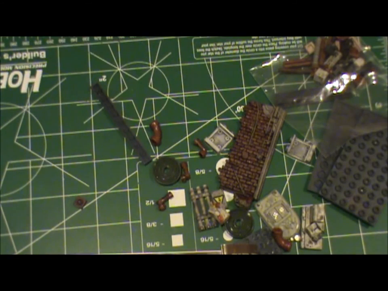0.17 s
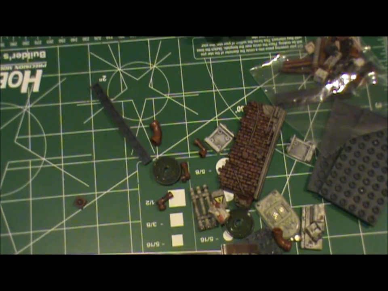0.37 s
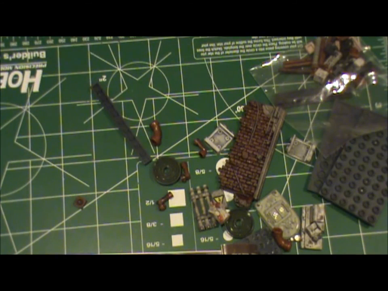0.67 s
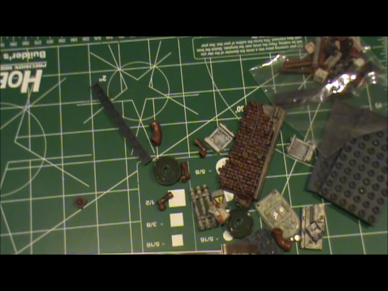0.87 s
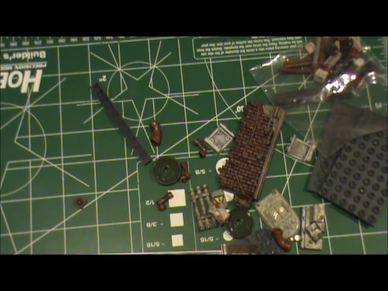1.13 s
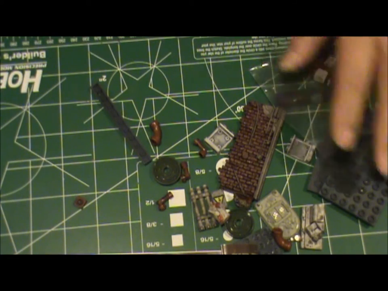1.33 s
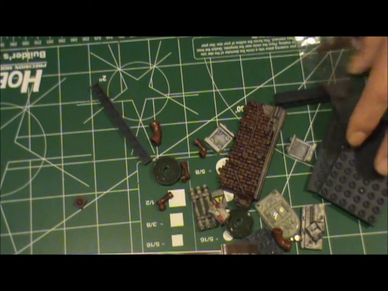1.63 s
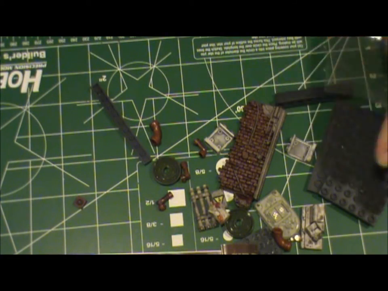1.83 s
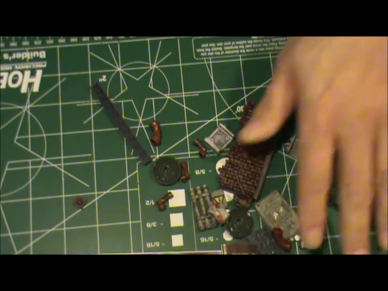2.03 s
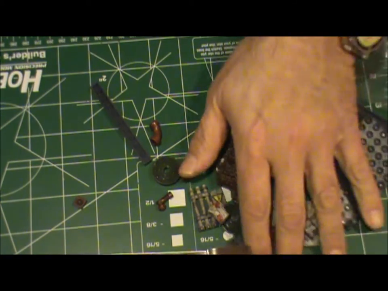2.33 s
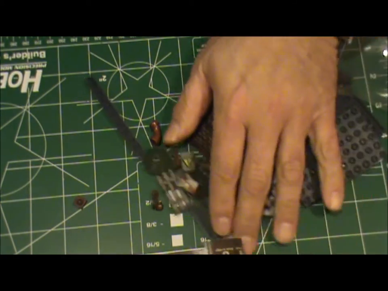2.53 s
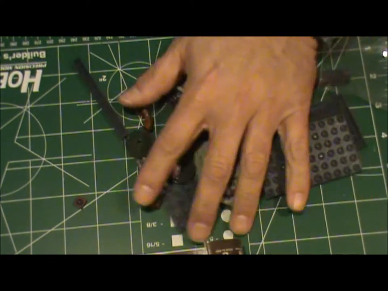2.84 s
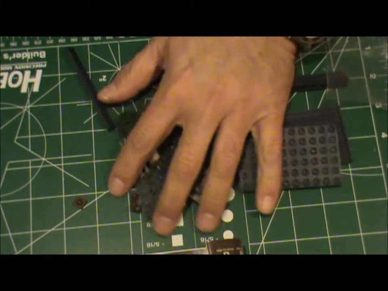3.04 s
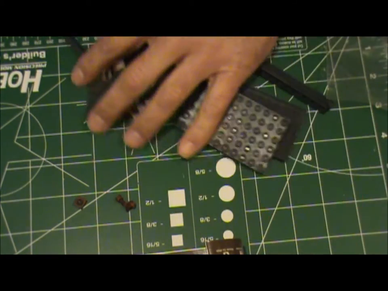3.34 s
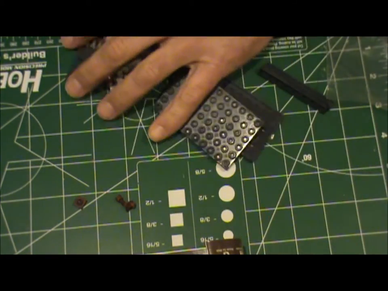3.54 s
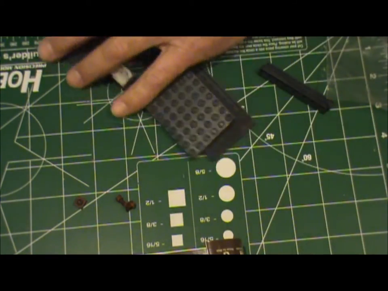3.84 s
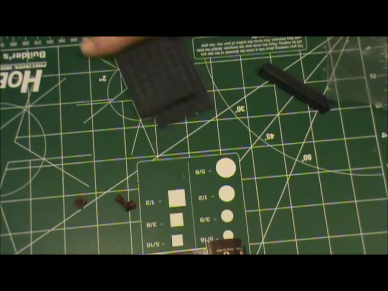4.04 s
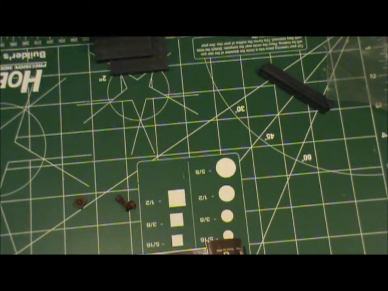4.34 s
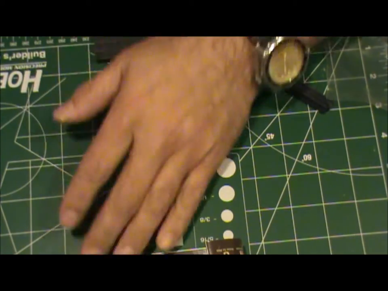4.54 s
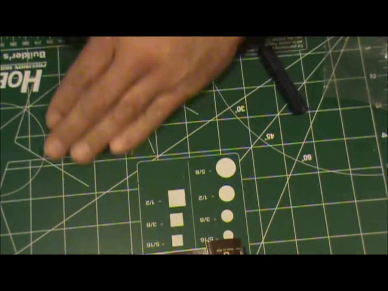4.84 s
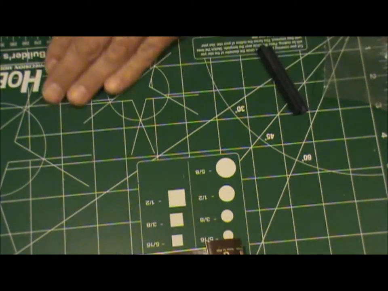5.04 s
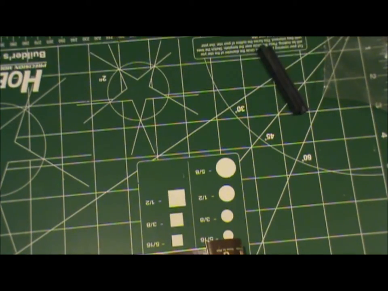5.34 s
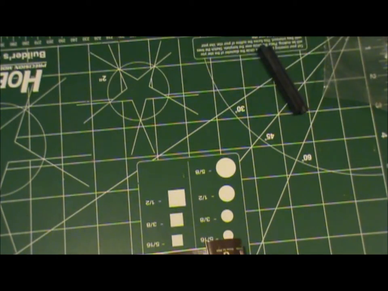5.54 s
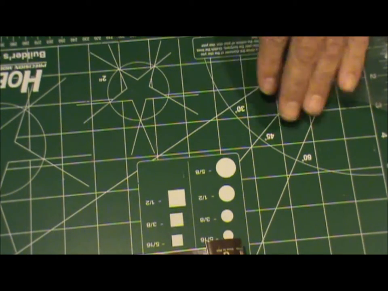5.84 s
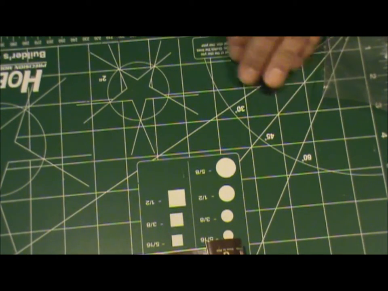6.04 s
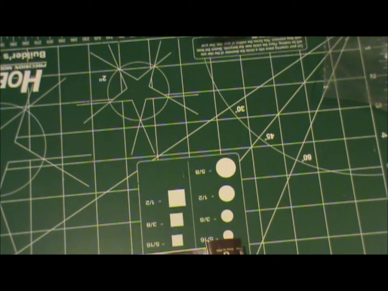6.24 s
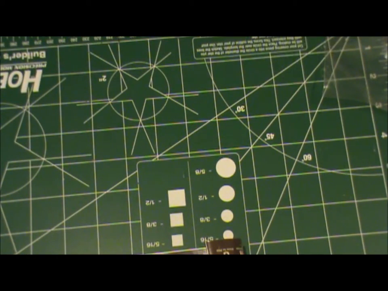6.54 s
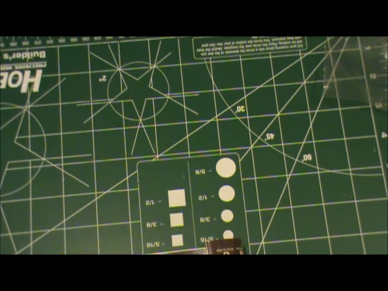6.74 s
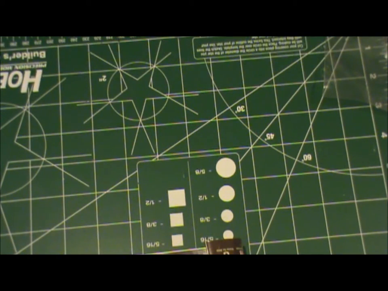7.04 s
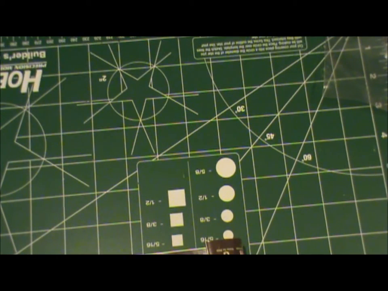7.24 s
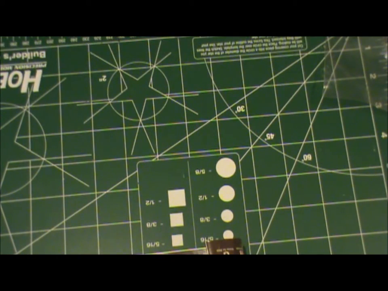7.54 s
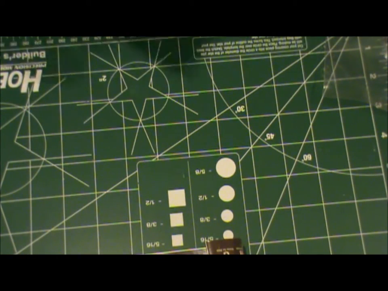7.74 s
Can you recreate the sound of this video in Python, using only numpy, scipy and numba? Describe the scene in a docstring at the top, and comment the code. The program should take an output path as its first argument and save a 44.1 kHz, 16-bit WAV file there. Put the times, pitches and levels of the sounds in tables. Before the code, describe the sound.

Close stereo sound in a small, fairly dry room with a faint steady hiss. From 0 to 0.4 seconds, hard little plastic pieces clatter into a hollow box, with bright clicks. Light taps and a soft drag follow, then another short clatter at 0.85-1.15. Around 1.4-1.9 there are only small clicks and faint rustling. From 2.2 a hand sweeps the heap over a cutting mat: a fine, dry, grainy scrape with thin singing tones and a few taps near 3.1, swelling until 4.0. The pieces then pour into the box, a dense loud rattle peaking near 4.25, trailing into knocks until 4.7. A quieter scrape leads to a sharp drop at 5.3-5.7. Light ticks and a thin drag around 6-6.35 precede tumbling knocks at 6.5-7.1. A short scrape with hollow knocks comes at 7.3-7.7, then faint settling to the end.

```python
"""A heap of small plastic pieces is swept by hand across a cutting mat and over the table edge into a box, close by.
Sliding is a dense fine grain, tumbling a coarse one that rings pieces and box; tables of moves shape both.
Single pieces knock as noise bursts that feed a piece's mode, the hollow box and bright edge ticks; light taps click,
dragged pieces sing through one moving resonance, and bumps ring the table top as low decaying sines.
A small room answers with a short tail of noise, over a steady hush; two microphone ports hear it in stereo."""
import sys
import numpy as np
from scipy import signal
from scipy.fft import rfft, irfft, next_fast_len
from scipy.io import wavfile
from scipy.ndimage import uniform_filter1d
from numba import njit

SR = 44100
rng = np.random.default_rng(int(sys.argv[2]) if len(sys.argv) > 2 else 0)


def int16_out(signal):
    """Quantize to a 16-bit WAV file."""
    q = np.round(np.clip(np.atleast_2d(signal).T, -1, 1) * 32767)
    wavfile.write(sys.argv[1], SR, q.astype(np.int16))


N = 348390

# Colour of knocking, tumbling plastic. Each row: frequency in Hz, relative level in dB per Hz.
PLASTIC_COLOUR = [(150, -66), (530, -11.5), (900, -3.5), (1140, -4.0), (1520, 3.5), (1750, -1.5),
                  (2050, 3.5), (2540, -3), (2850, -0.5), (7500, -8.5), (9750, -21.5), (16500, -120)]
# Colour of the bright ticking of edges. Each row: frequency in Hz, relative level in dB per Hz.
TICK_COLOUR = [(2600, -118.5), (3820, -38.5), (6500, 10), (8060, 12), (8790, 7.5), (9840, 7.0),
               (10900, 4.5), (13600, -2.5), (16000, -15.5)]


def undb(db):
    """Turn dB into an amplitude factor."""
    return 10 ** (np.asarray(db) / 20)


def unit(x):
    """Scale to rms 1."""
    return x / np.sqrt(np.mean(x ** 2))


def read(table, hz):
    """Value of a (Hz, value) table, straight on a log axis."""
    f, v = np.transpose(table)
    return np.interp(np.log(hz + 1), np.log(f + 1), v)


def response(table, size=2048):
    """Causal response of unit energy with the table's colour, from the folded cepstrum."""
    log_colour = read(table, np.fft.rfftfreq(size, 1 / SR)) * np.log(10) / 20
    cep = irfft(log_colour)
    cep[1:size // 2] *= 2
    cep[size // 2 + 1:] = 0
    h = irfft(np.exp(rfft(cep)))
    return h / np.sqrt(np.sum(h ** 2))


def through(x, h):
    """Convolve with a response, cut to the scene's length."""
    return signal.fftconvolve(x, h)[:N]


def decay(t, t60):
    """Exponential fade by 60 dB in t60 seconds."""
    return np.exp(-np.log(1000) * t / t60)


@njit
def rings(at, hz, t60, size, n, sr):
    """Each contact leaves a decaying sine, cut after its 60 dB time."""
    out = np.zeros(n)
    for k in range(len(at)):
        turn = np.exp(complex(-np.log(1000.) / (t60[k] * sr), 2 * np.pi * hz[k] / sr))
        z = size[k] + 0j
        for i in range(at[k], min(n, at[k] + int(t60[k] * sr))):
            z *= turn
            out[i] += z.imag
    return out


@njit
def svf(x, hz, share, sr):
    """Band-pass resonance with a moving centre; its width is a share of the centre."""
    y, b, l = np.empty(len(x)), 0., 0.
    for i in range(len(x)):
        g = np.tan(np.pi * hz[i] / sr)
        v = (b + g * (x[i] - l)) / (1 + g * (g + share))
        b, l, y[i] = 2 * v - b, l + 2 * g * v, share * v
    return y


def wander(per_s):
    """Slow chance of rms 1: noise averaged twice over 1 / per_s seconds."""
    size = int(SR / per_s)
    return unit(uniform_filter1d(uniform_filter1d(rng.standard_normal(N), size), size))


def contacts(per_s, spread_db, t60):
    """Random contacts of very unequal size, each a short burst of chatter; rms 1."""
    count = int(per_s * N / SR)
    clicks = np.zeros(N)
    sizes = undb(spread_db * np.minimum(rng.exponential(size=count), 3.5))
    np.add.at(clicks, rng.integers(0, N, count), sizes)
    fade = decay(np.arange(SR // 10) / SR, t60)
    power = through(clicks ** 2, fade ** 2)
    return unit(np.sqrt(np.abs(power)) * rng.standard_normal(N))


def air():
    """Quiet room and camera hiss: coloured noise with shared bass and treble that differs between the ports."""
    # Colour of the hush. Each row: frequency in Hz, relative level in dB per Hz.
    hush_colour = [(12, -37.5), (20, 3), (70, 7.5), (123, 9), (172, 3), (262, 1), (410, 4.5), (660, -4.5),
                   (2140, -11.5), (13200, -18.5), (16000, -22.5)]
    level_db = -61.5
    mid, side = (unit(through(rng.standard_normal(N), response(hush_colour, size=8192))) for _ in range(2))
    side = signal.lfilter(*signal.butter(1, 600, "high", fs=SR), side)
    return undb(level_db) * (mid + 0.58 * side * np.array([[1], [-1]]))


def room(x):
    """Table and walls scatter the sound differently to each port, as decaying band-passed noise."""
    t60_s, band_hz = 0.24, [380, 6500]
    t = np.arange(SR // 2) / SR
    tail = rng.standard_normal((2, len(t))) * decay(t, t60_s) * np.minimum(t / 0.0004, 1)
    tail = signal.lfilter(*signal.butter(1, band_hz, "band", fs=SR), tail)
    return np.array([through(x, h / np.sqrt(np.sum(h ** 2))) for h in tail])


def ports(x):
    """The camera body shades its two microphone ports, so level and phase differ between them."""
    # Shading by the body. Each row: frequency in Hz, left minus right level in dB.
    port_db = [(60, 0), (200, -2.5), (380, -3.5), (700, -7), (1290, -4.5), (2380, -1), (4400, 0), (8120, 2),
               (15000, 1.5)]
    # Phase between the ports. Each row: frequency in Hz, lead of the left port in radians.
    port_lead = [(200, -0.55), (520, -0.13), (850, -0.98), (1210, 0.83), (2300, -0.54), (4500, -0.3),
                 (7900, 1.42), (10500, 0.25)]
    size = next_fast_len(N)
    hz = np.fft.rfftfreq(size, 1 / SR)
    half = undb(read(port_db, hz) / 2) * np.exp(.5j * read(port_lead, hz))
    return irfft(rfft(x, size) * np.array([half, 1 / half]), size)[:, :N]


def thuds():
    """Hand and box bump the table; soft bumps ring its top low, briefly and unevenly."""
    # Bumps. Each row: start in seconds, relative level in dB, pitch in Hz, time to fade 60 dB in seconds
    # (held to 0.02 s or more).
    bump_rows = [(2.176, -39.5, 273, 0.11), (2.231, -40.5, 235, 0.22), (4.107, -30, 295, 0.081),
                 (4.263, -12, 270, 0.017), (4.309, -25, 230, 0.086), (5.396, -25, 154, 0.1),
                 (6.588, -33, 198.6, 0.22), (6.927, -26.5, 213, 0.13), (7.046, -13, 118, 0.03),
                 (7.566, -31, 204, 0.024)]
    s, level_db, hz, t60 = np.transpose(bump_rows)
    at = (s * SR).astype(np.int64)
    bumps = rings(at, hz, np.clip(t60, .02, .3), undb(level_db - 1.5), N, 1. * SR)
    uneven = bumps * (1 + 0.69 * wander(97))
    return signal.lfilter(*signal.butter(2, 500, fs=SR), uneven)


def taps():
    """Light taps of a piece on the mat: a dry click with a very short broad tail, band-passed twice."""
    # Taps. Each row: start in seconds, peak level in dB before the mix, centre in Hz.
    tap_rows = [(0.387, -36, 4000), (0.4655, -17, 5000), (0.7467, -25, 4700), (0.786, -28, 3200),
                (1.406, -41, 4500), (1.4598, -25, 2500), (1.471, -25.5, 2580), (1.485, -27, 3180),
                (1.5418, -23, 3400), (1.764, -36.5, 3000), (1.8422, -37, 2350), (2.003, -45, 2380),
                (2.2159, -35, 4000), (2.3042, -40, 5000), (2.3444, -40, 4200), (3.034, -27, 2000),
                (3.1378, -18, 4200), (3.226, -20, 4500), (5.841, -37.5, 1560), (5.9155, -56, 4400),
                (6.1798, -19, 3600), (6.2826, -25, 5660), (6.325, -29, 3000), (6.3514, -37, 5000),
                (6.378, -32, 3470)]
    t60_s, width = 0.018, 1.2  # width as a share of the centre
    t, out = np.arange(SR // 20) / SR, np.zeros(N + SR)
    chatter = rng.standard_normal((len(tap_rows), len(t))) * decay(t, t60_s)
    chatter[:, 0] += 5.  # the click itself
    for (s, db, hz), burst in zip(tap_rows, chatter):
        at = int(s * SR)
        centre = np.full(len(t), 1. * hz)
        click = svf(svf(burst, centre, width, 1. * SR), centre, width, 1. * SR)
        out[at:at + len(t)] += undb(db) * click / np.abs(click).max()
    return out[:N]


def drags():
    """Stick-slip grain feeds one resonance of a piece that sings above the scrape while it is dragged."""
    # Drags. Each row: start and end in seconds, start and end pitch in Hz, level in dB before a swell and the mix.
    drag_rows = [(0.472, 0.596, 3800, 2400, -44.5), (0.59, 0.76, 2500, 2760, -55.5),
                 (2.44, 2.695, 1800, 1830, -42), (2.865, 2.891, 2730, 2780, -37.5),
                 (3.18, 3.575, 2320, 2380, -43.5), (3.798, 4.04, 1380, 1540, -39),
                 (3.767, 4.093, 2350, 2340, -39), (4.786, 4.985, 3200, 3170, -46.5),
                 (5.118, 5.33, 3200, 3220, -46.5), (6.02, 6.31, 4500, 4800, -43),
                 (5.925, 6.305, 3200, 3500, -49.5), (7.474, 7.552, 5230, 5170, -34.5),
                 (7.486, 7.555, 5570, 5570, -38.5), (7.487, 7.553, 1510, 1470, -32.5),
                 (7.547, 7.68, 1310, 1100, -35.5), (7.762, 7.9, 1100, 900, -49)]
    width = .09  # share of the centre
    stray = 0.013  # the resonance strays by this share as the piece turns
    out, grain = np.zeros(N), contacts(1600, 1.2, 0.0091)
    turn = wander(40)
    for start, end, hz0, hz1, db in drag_rows:
        a, b = int(start * SR), int(end * SR)
        pitch = np.linspace(hz0, hz1, b - a) * (1 + stray * turn[a:b])
        tone = unit(svf(grain[a:b], pitch, width, 1. * SR))
        out[a:b] += undb(db) * np.sqrt(np.hanning(b - a)) * tone
    return out


def box(push):
    """The box's modes, radiating best in mid band; where it is struck keeps changing."""
    # Air and walls of the box. Each row: frequency in Hz, width in Hz, relative level in dB.
    box_modes = [(250, 89, -3.5), (323, 60, 1), (433, 48, -4), (528, 41, 3.5), (653, 60, 9), (731, 51, 7.5),
                 (850, 300, -9)]
    place_db, stray = 3.0, 0.03  # each spot favours other modes, and the load of pieces shifts them
    out = np.zeros(len(push))
    for hz, width, db in box_modes:
        struck = push * undb(place_db * wander(12.7))
        centre = hz * (1 + stray * wander(4.4))
        out += undb(db) / np.sqrt(np.pi * width / SR) * svf(struck, centre, width / hz, 1. * SR)
    return undb(-15.5) * signal.lfilter(*signal.butter(2, [304, 870], "band", fs=SR), out)


def knocks():
    """A sharp crack with chatter behind it excites piece, box and edge ticks."""
    # Single knocks. Each row: start in seconds, strength in dB, ring of the piece in Hz, then ring, box
    # and bright tick in dB relative to the strength, ahead of each layer's own gain.
    knock_rows = [(0.0543, -16, 2910, -2.5, -1, -27), (0.1346, -12.5, 4450, -4.5, -36, -14),
                  (0.2464, -25, 5000, 0, 5, -23), (0.2846, -22.5, 1400, 5, 0.5, -22),
                  (0.3066, -20.5, 1770, -9, -3, -14.5), (0.3257, -19.5, 1880, -13, -15.5, -19),
                  (0.344, -28, 5530, -20, -4, -19), (0.3696, -21.5, 1170, -8, -14, -29),
                  (0.8591, -13.5, 4350, -5, -8.5, -12), (0.8854, -19.5, 1730, -15, -4, -21),
                  (0.892, -28, 7140, 6, -39, -3), (0.8984, -16, 4160, 0, -12, -11),
                  (0.9292, -28.5, 4600, -8, 3.5, -20), (0.946, -16, 4770, 2, -24, -12),
                  (1.023, -17, 1256, -10, -4, -13), (1.0849, -18.5, 3620, -3, -12, -18),
                  (1.1218, -20, 1730, -5.5, -10, -26), (1.1493, -23.5, 1420, -2.5, -13.5, -18.5),
                  (2.176, -27.5, 3480, -6, -18, -19), (2.224, -30.5, 1150, -6, -30, -36),
                  (2.2474, -34, 1060, -7, -13, -24), (2.731, -38.5, 1790, -1, -17, -29.5),
                  (3.5945, -28, 4930, -7, -32, -18.5), (3.6321, -32, 3620, 0, -24, -10),
                  (3.728, -30.5, 2430, -1, -34, -28), (4.0339, -13, 4650, -3, -8, -13),
                  (4.0484, -35, 4730, -3, -7, -20), (4.1099, -18.5, 1320, -3, -5, -11),
                  (4.1205, -18.5, 2100, -14, -0.5, -15), (4.211, -19.5, 2870, 1, -7, -9),
                  (4.4424, -20.5, 1490, 5.5, 0, -28), (4.4702, -21.5, 1020, 8.5, -4, -33),
                  (4.5002, -15, 1070, -3, -12, -40), (4.5446, -19.5, 1070, -6, 2, -32),
                  (4.5735, -19.5, 1020, 0, -9, -16.5), (4.6029, -20.5, 3120, -12, -9.5, -13.5),
                  (4.618, -17, 1940, -1, -5, -35), (4.6354, -15.5, 1440, -5.5, -12.5, -32),
                  (4.7057, -30, 1043, -15, 6.5, -20), (4.7227, -24.5, 1017, -9.5, -11, -26),
                  (4.7714, -43.5, 1040, -4, 8, -17), (4.8024, -40, 4270, -3, 6, -20),
                  (4.9934, -34, 1550, -14, -23, -26), (5.3037, -24, 4850, 7, -2, -7),
                  (5.308, -17.5, 7350, 0, -20, -20), (5.3662, -15.5, 1120, -7, -5.5, -17.5),
                  (5.3896, -26.5, 1990, -1, -1, -23), (5.4038, -16.5, 1540, -14, -15, -14.5),
                  (5.4234, -18, 1370, -14, -2.5, -23), (5.5223, -23, 2190, -20, -13, -3),
                  (5.5782, -19, 2060, -8, -4, -21), (5.6088, -17.5, 9800, -5, -12.5, -12.5),
                  (5.6275, -18.5, 10100, -1.5, -19, -15), (5.6692, -22, 10200, -2, -9, -14),
                  (5.7009, -28, 2663, -1, -26, -17), (5.7025, -31, 3590, 4.5, -27, -20),
                  (5.7239, -29.5, 1300, -2, -7, -11), (5.7676, -37, 1340, 0, -3, -17),
                  (6.306, -28, 3040, -9, -23, -12), (6.4805, -18, 1540, -18.5, -6.5, -10.5),
                  (6.504, -26.5, 2120, -18, -9.5, -1.5), (6.565, -18, 2170, -10, -7, -20),
                  (6.5954, -14.5, 1400, -3.5, -4, -18), (6.6712, -20, 1890, -4, -7, -16.5),
                  (6.7082, -21.5, 2100, -13, 1, -42), (6.7264, -22.5, 1035, -2, -3, -35),
                  (6.7506, -25, 1420, 0, 5, -35), (6.7655, -42, 1410, -5, 0, -32),
                  (6.783, -14, 1360, -3, -11, -40), (6.8069, -17, 1810, -3.5, -3.5, -21.5),
                  (6.8349, -23.5, 1040, 1, 0.5, -28), (6.8673, -17.5, 4660, -5.5, -14, -30),
                  (6.931, -19, 1280, -13, -19, -12), (7.0454, -14.5, 1350, 4, -19, -36),
                  (7.0544, -13, 1590, 1, -9, -27), (7.2524, -38.5, 1270, 5.5, 2, -33),
                  (7.2789, -30.5, 1450, -1, -8, -29), (7.3562, -21.5, 4700, -9.5, -7, -26),
                  (7.3685, -20, 1870, -5, -30, -34), (7.3739, -27, 1930, 3, -4, -32),
                  (7.4164, -31, 2000, 3.5, 2, -28), (7.4325, -22.5, 2030, -5, -18, -31),
                  (7.7051, -27.5, 1253, 13, -10, -40), (7.7797, -43, 1060, 11, -28, -22)]
    chatter_t60_s, crack_s = 0.05, 0.00069
    box_push_s = 0.0044  # the box feels only the start of a knock
    s, level_db, hz, ring_db, box_db, tick_db = np.transpose(knock_rows)
    at, t = (s * SR).astype(np.int64), np.arange(SR // 6) / SR
    chatter = rng.standard_normal((len(s), len(t)))
    chatter = chatter / chatter[:, :SR // 200].std(axis=1, keepdims=True)  # rms 1 over the first 5 ms
    crack = undb(5) * np.exp(-t / crack_s)
    shape = decay(t, chatter_t60_s) * np.minimum(t / 0.0022, 1) + crack
    feel = np.array([1 + 0 * t, np.exp(-t / box_push_s), 1 + 0 * t])
    push, ring = np.zeros((3, N + len(t))), np.zeros(N + len(t))  # push on body, box and edges
    for k in range(len(s)):
        span = slice(at[k], at[k] + len(t))
        burst = chatter[k] * shape * undb(level_db[k])
        # a piece that rings more has less broad body sound
        push[:, span] += undb([[-.6 * ring_db[k]], [box_db[k]], [tick_db[k]]]) * burst * feel
        burst[0] += undb(level_db[k] + 23.0)  # the blow itself
        push[1, at[k]] += undb(level_db[k] + box_db[k] + 19.0)
        # the chatter keeps feeding the piece's damped mode
        mode = svf(burst, np.full(len(t), hz[k]), 0.056, 1. * SR)
        ring[span] += undb(ring_db[k]) * np.sqrt(SR / hz[k]) * mode
    body = undb(-11.0) * through(push[0], response(PLASTIC_COLOUR))
    drum = undb(4.5) * box(push[1, :N])
    tick = undb(5) * through(push[2], response(TICK_COLOUR))
    return body + drum + tick + ring[:N]


def heap_levels():
    """Rattle, drumming and ticking in dB over time; overlapping moves add in power."""
    # Swells of the moving heap, pushed over the mat or tumbling into the box. Each row: peak in seconds, rise and
    # fall in seconds per 20 dB ahead of the brake, rattle in dB, drumming and ticking in dB relative to the rattle.
    swell_rows = [(0.529, 0.56, 0.8, -48.5, -18, 1.5), (.768, 0.043, 0.11, -47, -8, -6),
                  (1.4, 0.13, 0.28, -57.5, -2, -2), (1.477, 0.062, 0.15, -42, -11, -6),
                  (1.67, 0.29, 0.29, -45, -12.5, -0.5), (2.234, 0.092, 0.061, -45.5, 1, -11),
                  (2.361, 0.025, 0.76, -37, -9, -7.5), (2.6, 0.47, 0.13, -38, -8, -3),
                  (2.74, 0.022, 1, -44, -4, -12), (3.2, 0.4, 0.36, -37.5, -5, -4),
                  (3.33, 0.97, 0.27, -34, -21, -8), (3.5, 0.93, 0.1, -43, -2.5, -12),
                  (3.63, 0.099, 0.23, -43.5, -7.5, -8), (3.73, 0.13, 0.12, -39.5, -7.5, -13),
                  (3.93, 0.28, 0.77, -31, -10.5, -7), (4.258, 0.29, 0.55, -20.5, -4, -8.5),
                  (4.88, 1, 0.54, -43, -21, -2), (5.009, 0.1, 0.74, -38.5, -9.5, -10),
                  (5.27, 0.44, 0.92, -36.5, -19, -2.5), (5.447, 0.1, 0.15, -20, -3, -5.5),
                  (6.05, 0.19, 1, -48, -11, 5), (6.32, 0.44, 0.23, -48.5, -2, 3.5),
                  (7.51, 0.33, 0.36, -34, -8.5, -5), (7.6, 0.13, 0.069, -33.5, 3, -20)]
    # Pieces land in the box and tumble. Each row: start in seconds, tumbling in seconds, settling in seconds
    # per 20 dB ahead of the brake (held to 0.01 s or more), rattle, drumming and ticking in dB as for the swells.
    pour_rows = [(0, 0.23, 0.21, -23, -1.5, -8), (0.882, 0.06, 0.17, -31, 0.5, -3),
                 (1.035, 0.031, 0.2042, -35, 3, -9), (4.047, 0.25, 0.51, -24.5, -4.5, -6.5),
                 (4.3, 0.137, 0.08, -25, 0.5, -5), (4.56, 0.12, -0.34, -38, 6.5, -8),
                 (5.309, 0, 0.22, -40.5, 2.5, 10), (5.383, 0, 0.424, -31, 10, -3),
                 (5.529, 0.07, 0.145, -29.5, 0.5, -6), (6.495, .0, 0.43, -28, -4, 1),
                 (6.6, 0, 0.66, -39.5, 11.5, -14), (6.71, 0.041, -0.73, -44, 18, -22),
                 (6.8, 0.3, -0.03, -34.5, -2.5, -15), (7.039, 0.018, 0.21, -27, 0, -7.5),
                 (7.254, 0, 2.5, -45.5, 4, -17), (7.365, 0.037, -1.7, -52, 0, -25),
                 (7.72, 0.33, -2, -45, -13.5, -4.5)]
    landing_s = 0.017  # rise of a pour, per 20 dB ahead of the brake
    brake_db = 18.5  # a move falls ever faster; a straight fall of this size is doubled
    # drumming swells and fades more gently than the rattle, ticking more steeply
    slopes = [1, 0.77, 1.74]
    t = np.arange(0, N / SR + .002, .002)
    moves = [(s, rise, 0, fall, *db) for s, rise, fall, *db in swell_rows]
    moves += [(s, landing_s, *rest) for s, *rest in pour_rows]
    power = 1e-10
    for s, rise, hold, fall, rattle_db, drum_db, tick_db in moves:
        before = np.maximum(s - t, 0) / max(rise, .003)
        after = np.maximum(t - s - hold, 0) / max(fall, .01)
        down = 20 * (before + after)
        down = down * (1 + (down / brake_db) ** 2)
        peak_db = rattle_db + np.array([[0], [drum_db], [tick_db]])
        power = power + undb(peak_db - np.outer(slopes, down)) ** 2
    return [np.interp(np.arange(N) / SR, t, 10 * np.log10(p)) for p in power]


def heap():
    """Sliding is a fine dense grain on the mat, tumbling a coarse one that rings pieces and box."""
    # High modes that most pieces share. Each row: frequency in Hz, relative spread in Hz, relative level in dB.
    piece_modes = [(2970, 100, -12), (4750, 130, -9.5), (8160, 170, -11), (9500, 130, 0.5),
                   (10200, 370, -4), (12700, 300, -8.5)]
    # Colour of pieces sliding on the mat. Each row: frequency in Hz, relative level in dB per Hz.
    scrape_colour = [(400, -34.5), (900, -0.5), (1870, 0), (3900, -1.5), (5500, -4), (6600, -10),
                     (9500, -18), (16500, -67)]
    # Colour of mat and table under the scrape. Each row: frequency in Hz, relative level in dB per Hz.
    mat_colour = [(60, -13), (250, -4.5), (750, -4), (1150, -5), (2500, -51.5)]
    scrape_hz, scrape_stray = [1900., 3000., 4600.], .08  # colours of the sliding heap, straying as it shifts

    rattle_db, low_db, tick_db = heap_levels()
    loose = np.clip(0.5 + (low_db - rattle_db) / 16, .03, .8)  # a heap that drums hard is tumbling in the box
    slide_share, tumble_share = np.sqrt(1 - loose), np.sqrt(loose)
    slide, tumble = contacts(3000, 1.0, 0.0074), contacts(320, 3.7, 0.01)
    push = slide_share * slide + tumble_share * tumble

    # some rings fall near a shared mode, the rest anywhere
    when, where, length, strength, pick, kind = rng.random((6000, 6)).T
    mode = np.array(piece_modes)[(pick * len(piece_modes)).astype(int)]
    shared = kind < .4
    pitch = np.where(shared, mode[:, 0] + 1.68 * mode[:, 1] * (where - .5), 1200 * 8 ** where)
    ring_db = np.where(shared, mode[:, 2], read(PLASTIC_COLOUR, pitch))
    size = undb(ring_db - 2.0 * np.log(strength + 0.0015))
    t60 = (0.048 + 0.058 * length) * np.where(shared, .45, 1)
    at = (when * N).astype(np.int64)
    ring, glint = (unit(rings(at[m], pitch[m], t60[m], size[m], N, 1. * SR)) for m in (~shared, shared))

    colour = sum(svf(slide, hz * (1 + scrape_stray * wander(5.9)), 0.26, 1. * SR) for hz in scrape_hz)
    scrape = (slide + undb(-7.5) * unit(colour)) * undb(3.14 * wander(31))
    rattle = through(slide_share * scrape, response(scrape_colour))
    rattle += through(tumble_share * tumble, response(PLASTIC_COLOUR))
    rattle += undb(2.5) * tumble_share * ring

    low = undb(low_db - 1.5) * push
    inside = np.clip(1.29 * loose - .15, 0, 1)  # share of the drumming that happens in the box
    drum = box(np.sqrt(inside) * low)
    drum += undb(-1.5) * through(np.sqrt(1 - inside) * low, response(mat_colour))

    edges = push * np.sign(rng.standard_normal(N))  # same contacts, unrelated fine motion
    tick = through(edges, response(TICK_COLOUR)) + undb(1.5) * tumble_share * glint
    return undb(rattle_db - 7.5) * rattle + drum + undb(tick_db - 6.0) * tick


def scene():
    """Sum the sources, then add direct sound at the ports, room and hush."""
    pieces = heap() + drags() + knocks() + thuds() + taps()
    # small things radiate no deep bass
    pieces = signal.lfilter(*signal.butter(2, 122, "high", fs=SR), pieces)
    return undb(-1.73) * ports(pieces) + undb(-11.5) * room(pieces) + air()


def record(dry):
    """The camera rounds the loudest peaks and cuts the top."""
    rounded = np.tanh(2.0 * dry) / 1.862
    top_hz = 16200
    return signal.sosfilt(signal.ellip(10, .2, 80, top_hz, fs=SR, output="sos"), rounded)


dry = scene()
out = record(dry)
int16_out(out)
```